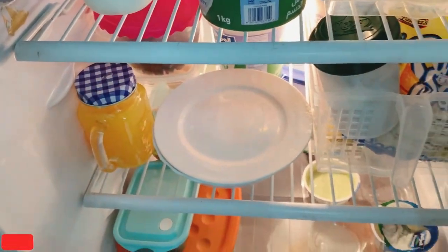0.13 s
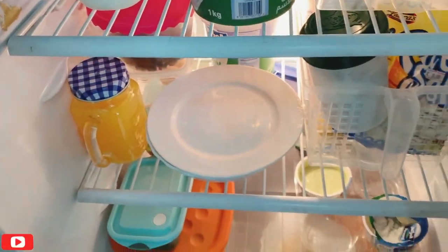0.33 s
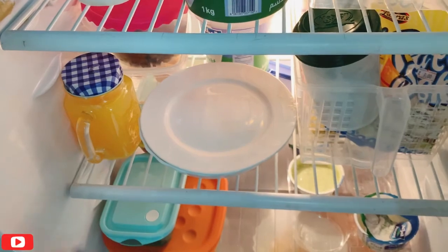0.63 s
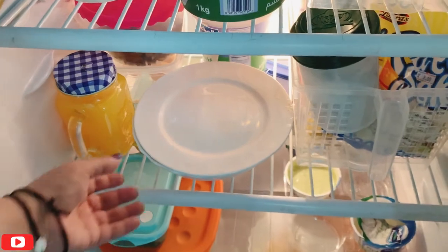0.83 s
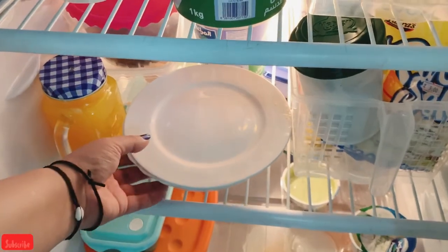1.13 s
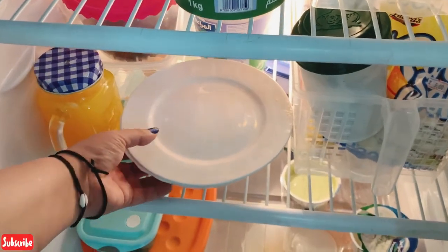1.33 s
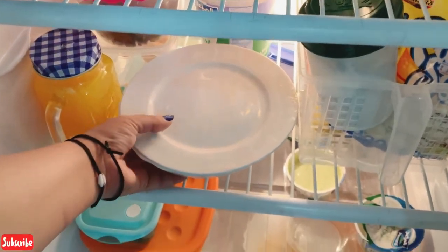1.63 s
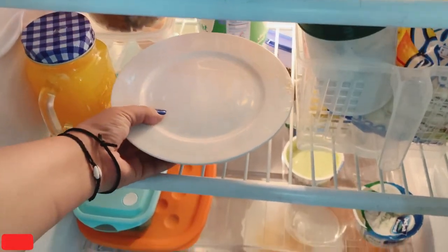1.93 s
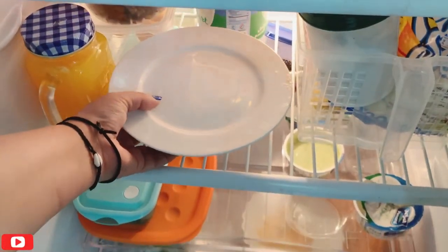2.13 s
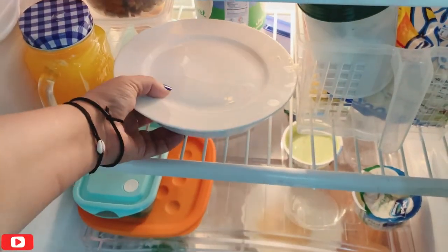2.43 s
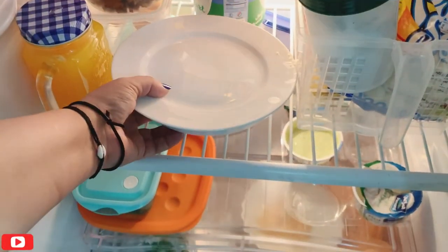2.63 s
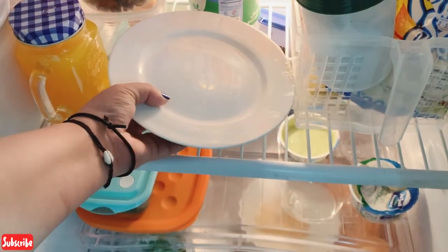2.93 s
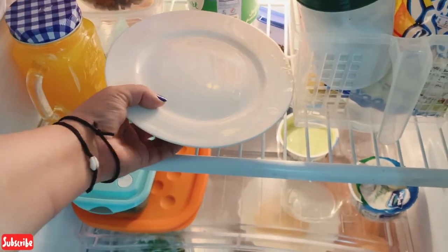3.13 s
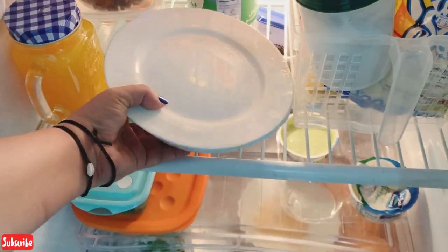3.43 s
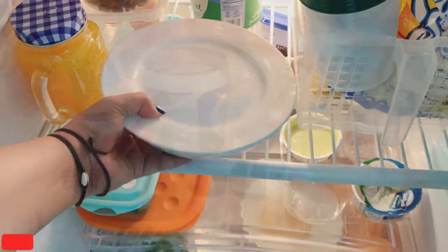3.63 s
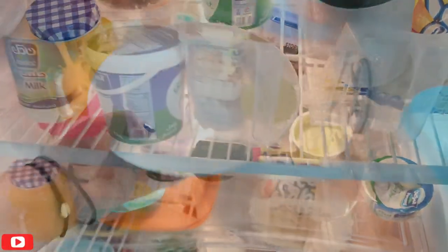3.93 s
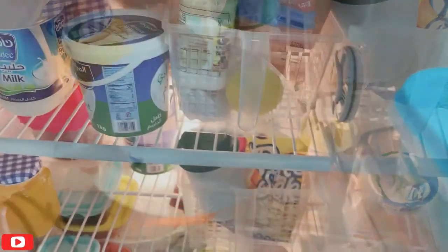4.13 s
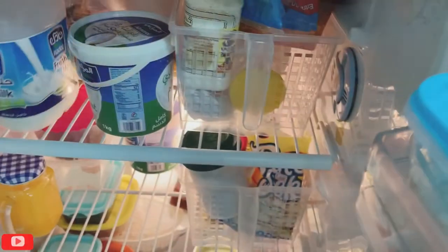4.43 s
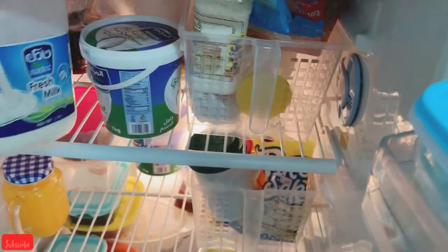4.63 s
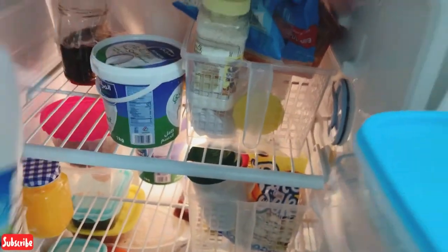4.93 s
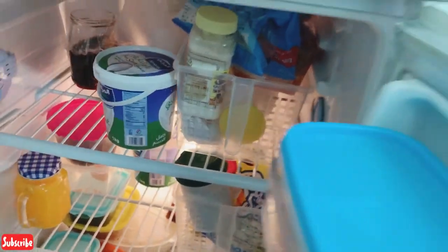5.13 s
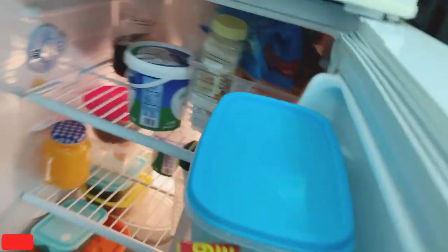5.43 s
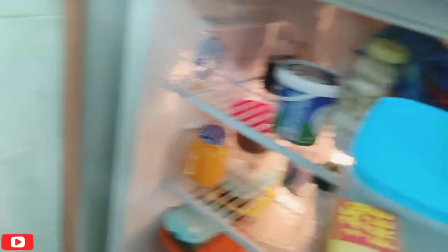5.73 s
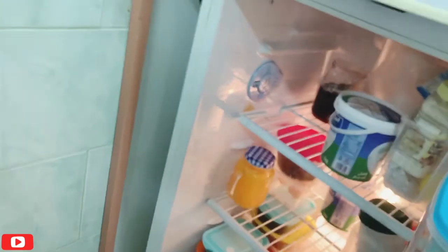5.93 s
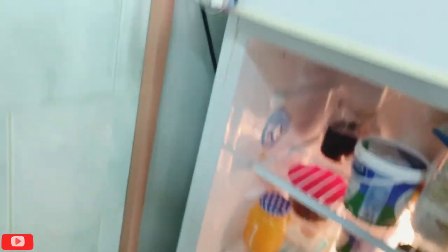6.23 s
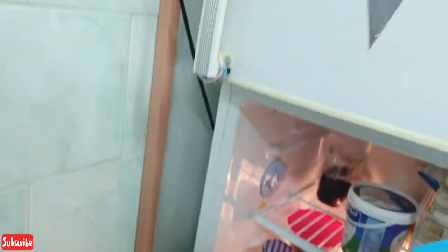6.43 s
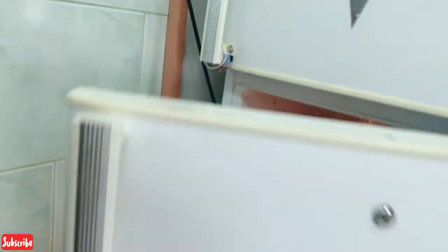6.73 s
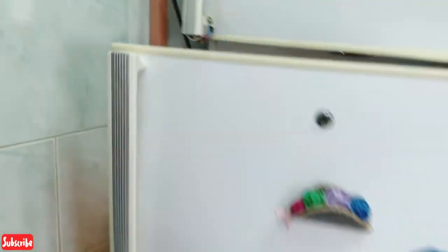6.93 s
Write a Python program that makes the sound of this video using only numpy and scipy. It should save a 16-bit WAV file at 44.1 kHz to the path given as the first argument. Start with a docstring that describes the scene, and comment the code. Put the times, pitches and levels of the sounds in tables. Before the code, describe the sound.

Quiet kitchen hum, then a ceramic plate clatters sharply across wire racks with low shelf thumps, followed by plastic scuffing, hollow knocks and a soft door thud.

```python
"""Low background noise: a lumpy rumble, a machine drone, hum and hiss, all shaped noise or wavering sines. Then
a china plate taps and judders over the wire shelf of an open refrigerator: modal rings set off by contacts. The
shelf thumps and a glass jar pings, both modal; the plate skids to rest from wire to wire. Last, plastic rustles
in noise grains, tubs knock, and door and racks bump as sagging notes with thuds. Event levels are those ahead
of the microphone colour."""
import sys
import numpy as np
from scipy import signal
from scipy.fft import rfft, irfft, next_fast_len
from scipy.io import wavfile
from scipy.ndimage import uniform_filter1d

SR = 44100
rng = np.random.default_rng(int(sys.argv[2]) if len(sys.argv) > 2 else 0)


def master(y):
    """Save y as 16-bit WAV."""
    cut = np.clip(np.atleast_2d(y).T, -1, 1)
    pcm = np.round(cut * 32767)  # scale
    wavfile.write(sys.argv[1], SR, pcm.astype(np.int16))


N = 312669
TIME_S = np.arange(N) / SR
RING_S = np.arange(SR // 2) / SR  # time axis of one event

# background trims: t/s, rumble/dB, drone/dB
BACKGROUND_TRIM = [(0.0, -58.5, -57), (1.2, -54.5, -57), (2.248, -51.5, -51.5), (5.208, -54, -54.5),
                   (5.9, -62, -52.5), (6.12, -46, -46.5), (6.4, -60.5, -56.5), (7.09, -54, -54)]
# trim of the noise near 2 kHz: t/s, level/dB
AIR_TRIM = [(0, -87), (1.3, -100), (1.5, -71.5), (4.65, -71.5), (4.8, -66), (6.2, -69.5), (6.5, -77),
            (7.09, -73)]
# noise spectra: f/Hz, relative density/dB
RUMBLE_SPECTRUM = [(20, -36.5), (32, -28), (41, -2.5), (60, 5.5), (80, -5.5), (110, -10.5), (150, -9.5),
                   (200, -24), (400, -45.5)]
DRONE_SPECTRUM = [(100, -7), (190, -4), (270, 5), (350, -0.5), (480, -6), (750, -7), (1100, -7),
                  (1600, -11.5), (1900, -17), (2400, -38), (4000, -57)]
AIR_SPECTRUM = [(1000, -26), (1900, 8), (2300, 2.5), (2700, -8.5), (4000, -10), (6000, -23.5), (12000, -36)]
FINE_HISS_SPECTRUM = [(1500, -8.5), (3500, 4.5), (5000, -2.5), (7000, 0), (9000, -3.5), (13000, 0.5),
                      (14500, -4.5), (16000, -23)]
CLATTER_SPECTRUM = [(60, -18), (350, -11.5), (650, 4), (830, -10.5), (1050, -3.5), (1350, -0.5),
                    (1900, 5.5), (2170, -3), (3000, 1), (3700, -5), (5000, -2), (7000, -12), (9000, -14.5),
                    (13000, -24), (16000, -33.5)]
TUB_SPECTRUM = [(60, -40), (200, -5.5), (450, 1), (900, 1), (1500, 0.5), (2500, -6), (4000, -12.5),
                (7000, -17.5), (10000, -27), (13500, -27), (16000, -41)]
RUB_HISS_SPECTRUM = [(1500, -21.5), (2800, -5.5), (4000, 1), (5200, -2), (7000, 0.5), (9000, -1.5),
                     (13000, 0.5), (14400, 1.5), (15500, -19.5)]
RUB_BODY_SPECTRUM = [(120, -8), (300, 13), (700, -2.5), (1400, -1.5), (2100, -7), (3000, -8), (5000, -17),
                     (9000, -29)]
# machine tones: mean f/Hz, level before the hum trim/dB
HUM_TONES = [(148, -62), (296, -66)]
# hum trim: t/s, level/dB
HUM_TRIM = [(0, -13.5), (4.0, -1), (4.8, 9.5), (7.09, -0.5)]
# decay of the room: f/Hz, t60/s
ROOM_T60 = [(100, 0.99), (500, 0.33), (3000, 0.29), (8000, 0.081), (14000, 0.054)]

# left-right likeness of near and diffuse sound: f/Hz, likeness (1 = same)
NEAR_LIKENESS = [(50, 0.94), (300, 1), (600, 0.16), (1400, 1), (2300, 0.17), (4500, 0.57), (7000, 1),
                 (13000, 0.95)]
FAR_LIKENESS = [(50, 0.7), (150, 0.56), (300, 0.29), (600, 0.02), (2500, .05), (4500, .3), (7000, 0.17),
                (13000, .55)]
# microphone ports: f/Hz, left lead/rad
PORT_PHASE = [(20, 0), (400, -.2), (700, -.5), (1200, .4), (2200, 0), (3100, 2.1), (3900, 1.5), (4900, 3.1),
              (6600, 6.1), (7300, 6.4), (9500, 9.4), (10000, 9.5), (11900, 12.5), (12800, 12.7),
              (14700, 15.6)]
# microphone ports: f/Hz, left-right/dB
PORT_BALANCE = [(40, 0), (120, -0.5), (300, -2), (600, -1.5), (1200, -0.5), (2400, -0.5), (4500, -0.5),
                (14000, 0)]
# microphone response: f/Hz, level/dB
MIC_COLOUR = [(20, -3.5), (8600, -4.5), (9300, -4.5), (9900, -16.5), (10700, -5.5), (14000, -6),
              (14900, -9), (16000, -4.5)]
EDGE_HZ = 16000

# bumps of cabinet walls, door and racks: t/s, level/dB, f of the yielding wall/Hz
BUMPS = [(2.385, -34, 262), (2.728, -26.5, 210), (3.322, -20.5, 235), (3.353, -26.5, 396),
         (3.92, -43.5, 228), (4.197, -52, 251), (4.244, -38.5, 182), (4.452, -50, 285), (4.69, -31, 169),
         (4.712, -29.5, 123), (5.545, -35.5, 321), (5.84, -37.5, 372), (5.875, -34, 278),
         (6.073, -30.5, 115), (6.127, -38.5, 109), (6.189, -38.5, 142), (6.225, -38, 129)]
# knocks of tubs and door racks: t/s, level/dB, softness/(dB/kHz), f of the struck wall/Hz
KNOCKS = [(3.867, -52.5, 1.5, 1480), (3.915, -51.5, 1.94, 1005), (4.041, -56, 1, 776),
          (4.061, -44.5, 4, 730), (4.192, -36.5, 8.5, 575), (4.239, -37.5, 6, 550), (4.371, -40, 4, 1210),
          (4.386, -41, 5, 806), (4.685, -34.5, 4.5, 872), (5.438, -53, -1, 1995), (5.543, -27.5, 8.5, 470),
          (5.556, -36.5, 6.5, 870), (5.579, -29, 9.5, 683), (5.829, -46, 1, 580), (5.861, -35.5, 2.1, 440),
          (6.069, -41, 6.5, 694), (6.103, -37, 13, 1220), (6.139, -36, 10, 646), (6.185, -18, 20, 659),
          (6.731, -51.5, 2, 1330)]
# sliding plastic, one table a movement: t/s, level/dB
RUBS = [
    [(3.78, -57), (3.97, -74), (4.0, -58), (4.44, -53), (4.53, -68)],
    [(5.435, -56), (5.45, -42), (5.58, -47.5), (5.7, -51), (5.8, -50.5), (5.95, -49.5), (6.06, -54),
     (6.12, -64), (6.3, -69), (6.5, -79.5)],
]
# short strokes of plastic or hand: middle t/s, half length/s, body/dB, hiss/dB
SCUFFS = [(1.497, 0.025, -56.5, -71), (4.022, 0.024, -50.5, -48), (4.223, 0.041, -56, -48),
          (4.39, 0.047, -56, -47), (4.458, 0.016, -38.5, -55), (5.496, 0.026, -40.5, -45.5),
          (5.527, 0.012, -41, -60), (5.612, 0.023, -47, -46), (5.753, 0.019, -42, -42.5),
          (5.984, 0.041, -46, -50), (6.05, 0.059, -43, -72), (6.764, 0.033, -46, -60.5)]
# creaks of a dragged tub: middle t/s, half length/s, level/dB
CREAKS = [(4.05, 0.024, -46.5), (4.394, 0.032, -44), (4.397, 0.16, -57), (5.753, .022, -52),
          (5.859, 0.015, -41.5)]
# jar pings: t/s, level/dB
JAR_PINGS = [(1.716, -41), (2.263, -44.5), (2.35, -43)]
# full weight on the shelf: t/s, level/dB, f favoured by the blow/Hz
THUMPS = [(1.957, -46, 281), (2.029, -35, 88.4), (2.261, -32, 206), (2.359, -35.5, 150),
          (2.725, -22.5, 243), (2.742, -29.5, 75), (2.766, -27.5, 355), (2.864, -19, 107),
          (2.874, -25, 257), (3.128, -28.5, 210), (3.16, -33, 116.5), (3.317, -23.5, 398),
          (3.354, -30, 433), (3.398, -41, 400), (3.426, -39, 119), (3.445, -38.5, 375)]
# single taps on the wires: t/s, level/dB, softness/(dB/kHz), f favoured/Hz
TAPS = [(1.712, -38.5, 4.5, 1550), (2.067, -39, 3.5, 1360), (2.156, -40, 4, 2040), (2.258, -34, 2, 1400),
        (2.308, -36, 1.2, 1130), (2.352, -33.5, 3, 3300), (2.357, -35.5, 3, 1550),
        (2.371, -30.5, 4.5, 1290), (2.393, -35, 5, 1290), (2.717, -44, -1, 6700), (2.724, -40, 0, 6700),
        (3.118, -45.5, 1.6, 950), (3.313, -34.5, -1, 1242), (3.321, -26, 3, 956),
        (3.496, -47.5, 0.27, 3980), (3.52, -49.5, 0.5, 4020)]
# rim onto a wire: t/s, level/dB, softness/(dB/kHz), trim of the lowest band/dB, f favoured/Hz
CLACKS = [(1.885, -22, 1.6, -4, 1370), (1.902, -20.5, 1.5, 0, 1270), (1.921, -21.5, 2.5, 2.5, 1280),
          (1.943, -23, 2, 2.5, 1300), (1.973, -41, -0.5, -12, 1930), (1.987, -40, 2, 14.5, 1450),
          (2.002, -32, 4.5, -1, 1360), (2.759, -27.5, 1.74, -0.5, 1210), (2.783, -26, 2, 7, 1610),
          (2.7987, -13.5, 2, -5.5, 1260), (2.809, -19, 2, 0.5, 1400), (2.817, -12.5, 1.5, -7, 1290),
          (2.829, -13, 2.44, -2, 2000), (2.84, -16, 3, -2, 1300), (2.851, -17.5, 2.5, 1, 1270),
          (3.3505, -20, 2.5, -7, 1520), (3.373, -29, 3, -9, 1610), (3.387, -25.5, 4.5, -2, 1290),
          (3.401, -36, 1.5, -11, 1870)]
# foot from wire to wire: t/s, level/dB, softness/(dB/kHz), trim of the lowest band/dB, f favoured/Hz
SKIDS = [(3.6535, -32.5, 0.5, 10.5, 1399), (3.678, -35.5, -2.5, 13, 1390), (3.699, -39.5, .3, 13, 1440),
         (3.718, -45, -1, 17.5, 470), (3.736, -45, 0, 19, 450), (3.757, -45, -0.1, 10, 1640)]

# modes: f/Hz, relative level/dB, t60/s, left-right/dB
TUB_WALL_MODES = [(756, -14, .03, -6), (970, 5, 0.042, 0), (1360, 3, 0.027, -7), (1390, -9, .04, -6),
                  (1900, -3, 0.034, 0), (2600, -2, 0.017, -7), (3590, 0, .02, -16), (4000, 5.5, 0.013, 0)]
JAR_MODES = [(1810, -6, 0.31, -0.5), (3080, -28, 0.12, -11)]
SHELF_MODES = [(63.8, -2.5, 0.22, 5.5), (82, 5, 0.26, 3), (106.2, 17.5, 0.29, -3), (139, 4, 0.071, 0.5),
               (164.9, 0.5, 0.28, 4.5), (254.5, 1, 0.16, 2), (271.4, 2.5, 0.13, -1.5),
               (359.6, -7.5, 0.78, 0.5), (388, -1, 0.19, 1.5), (399, -9, 0.27, 0.5),
               (454, -9.5, 0.17, -3.5)]
# modes under the holding hand: f/Hz, relative level/dB, undamped t60/s, left-right/dB
PLATE_MODES = [(479.5, 1, .12, -0.5), (681, 2, 0.22, 4), (1230, -8, 0.28, -7), (1248, 1, .09, -5),
               (1270, 2, 0.082, -5), (1399, 1.5, 0.064, -1.5), (1540, -3, 0.1, 1.5), (1603, -3, 0.17, 0),
               (1621, -4, 0.13, -.5), (1941, -9, .22, -1.5), (2658, -4, 0.22, -6), (3010, -2.5, 0.09, -5),
               (3000, -9.5, 0.18, -5), (3320, -2, 0.18, -2), (4330, -1, 0.19, 3.5), (4490, -4, 0.15, -1.5),
               (4620, 0.5, .11, 0.5), (5270, -5, .1, 0.5), (6030, -6.5, .11, 0), (6040, -9, 0.15, 2),
               (6630, -3.5, .13, 3), (7300, -8, 0.099, -2)]
FOOT_MODES = [(450.7, -7, 0.13, 5), (501.4, 1, 0.12, -1.5), (673, -6, 0.25, 4), (1360, -0.5, 0.039, -3),
              (1644, -5, 0.11, 1), (1970, -10, 0.28, 2), (2444, -19, 0.14, -6), (2980, -4, 0.3, -3),
              (3260, 1, 0.096, -9), (3900, 2, 0.059, 1), (4720, 3.5, 0.096, -1), (5475, 3.5, 0.088, -2),
              (6710, -5, 0.039, 2)]
WIRE_MODES = [(510, -1.5, .15, -2.5), (668, -6.5, 0.26, 5.5), (962, -1, .11, -1), (1110, -4.5, 0.054, -2.5),
              (1288, -3, 0.2, -4), (1537, -5, 0.12, 0), (2011, -5, 0.29, -2.5), (2640, -7, 0.21, -5),
              (3014, -10.5, 0.11, -2.5), (3470, -4, .1, -3.5), (4565, -1.5, 0.16, -0.5),
              (5780, -12.5, 0.051, 1.5), (6660, -8, 0.14, 2), (12900, -5.5, 0.025, 2)]

# bands of taps and knocks: low f/Hz, high f/Hz
BANDS = [(400, 800), (870, 2000), (2500, 8000), (10500, 14500)]
# bands of clacks and skids: low f/Hz, high f/Hz
SLIP_BANDS = [(400, 800), (1000, 1800), (2300, 4000), (5500, 8500)]
# perfectly hard contact, relative to its level: one value a band/dB
SLIP_HARD_DB = [-9, 0, -7.5, -2.5]
TAP_HARD_DB = [-2.5, -0.5, 1.5, 3]
KNOCK_HARD_DB = [-3.5, 0.5, 9.5, 15]

# slips above this level rattle the wires: dB of rattle per dB
RATTLE_FROM_DB, RATTLE_DB_PER_DB = -22.5, 0.45
# shove on the shelf: dB relative to the contact, f favoured/Hz
CLACK_PUSH, TAP_PUSH = (-16, 290), (-2.5, 230)
PUSH_LAG_S = 0.004
FAVOUR_OCTAVES = 0.28  # width of the favoured region
PLACE_DB = 3  # chance spread of each mode, either way
BEND_S = 0.016  # time constant of the settling pitch
HELD = 0.62  # share of t60 left by the holding hand


def amp(db):
    """dB to amplitude."""
    return 10 ** (np.asarray(db) / 20)


def rms(x):
    """Root mean square, never zero."""
    return np.sqrt(np.mean(x ** 2) + 1e-20)


def attack_level(x):
    """Rms of the first 20 ms."""
    return rms(x[..., :SR // 50])


def dying(t60_s):
    """Exponential decay by 60 dB in t60_s."""
    return np.exp(-np.log(1000) * RING_S / max(t60_s, 1e-3))


def onset(rise_s):
    """Exponential rise of a contact that yields."""
    return 1 - np.exp(-RING_S / rise_s)


def track(points, *outside):
    """Two-column time table, linear in t."""
    return np.interp(TIME_S, *np.transpose(points), *outside)


def read(points, hz):
    """Spectrum table on a log-frequency axis."""
    f, value = np.transpose(points)
    return np.interp(np.log(hz + 1), np.log(f + 1), value)


def bins(x):
    """FFT bin frequencies in Hz."""
    return np.fft.rfftfreq(x.shape[-1], 1 / SR)


def pad_for_fft(x, tail):
    """Zero-pads by at least tail samples to a fast FFT length."""
    size = x.shape[1]
    return np.pad(x, ((0, 0), (0, next_fast_len(size + tail, True) - size)))


def add(mix, s, sound):
    """Adds sound to mix at s seconds, cut at the end."""
    part = mix[:, max(round(s * SR), 0):][:, :sound.shape[1]]
    part += sound[:, :part.shape[1]]


def colour(x, spectrum):
    """Filters x by a table of f/Hz, gain/dB."""
    padded = pad_for_fft(x, SR // 20)
    shaped = rfft(padded) * amp(read(spectrum, bins(padded)))
    return irfft(shaped, padded.shape[1])[:, :x.shape[1]]


def noise(spectrum, likeness, size, ripple_db=0, ripple_hz=70):
    """Coloured stereo noise of rms 1, partly shared; crowded resonances ripple it, fully above 3 kHz."""
    white = rng.standard_normal((2, next_fast_len(size, True)))
    hz, knots = bins(white), rng.standard_normal(SR // 50)
    ripple = ripple_db * np.interp(hz / ripple_hz, np.arange(len(knots)), knots)
    ripple *= np.minimum(hz / 3000, 1)
    a, b = rfft(white) * amp(read(spectrum, hz) + ripple)
    same = np.clip(read(likeness, hz), -1, 1)
    right = same * a + np.sqrt(1 - same ** 2) * b
    pair = irfft([a, right], white.shape[1])[:, :size]
    return pair / rms(pair)


def wander(per_s):
    """Random drift between knots of rms 1."""
    knots = rng.standard_normal(int(N / SR * per_s) + 2)
    return np.interp(TIME_S * per_s, np.arange(len(knots)), knots / rms(knots))


def patchy(x, depth_db, size):
    """The colour drifts in smooth random patches of time and frequency."""
    z = signal.stft(x, nperseg=1024)[2]
    field = rng.standard_normal(z.shape[1:])
    field = uniform_filter1d(uniform_filter1d(field, size, 0), 6, 1)
    gain = amp(depth_db * field / rms(field))
    return signal.istft(z * gain / rms(gain), nperseg=1024)[1][:, :N]


def grains(per_s, spread_db):
    """Random tiny slips of uneven size, rms 1."""
    size = amp(spread_db * np.minimum(rng.exponential(1, N), 3)) * rng.choice([-1, 1], N)
    slips = size * (rng.random(N) < per_s / SR)
    return slips / rms(slips)


def excite(force, response):
    """A body answers a running force; rms 1."""
    sound = signal.oaconvolve(force[None], response[:, :SR // 10], axes=1)[:, :N]
    return sound / rms(sound)


def ring(modes, bend=0):
    """Decaying modes start sharp by the share bend and settle; level and phase differ at the two ports."""
    clock = RING_S + bend * BEND_S * (1 - np.exp(-RING_S / BEND_S))
    sides = np.array([[.5], [-.5]])
    out = np.zeros((2, len(RING_S)))
    for (hz, db, t60_s, pan_db), (sign, skew) in zip(modes, rng.choice([-1, 1], (len(modes), 2))):
        offset = skew * np.arccos(np.clip(read(NEAR_LIKENESS, hz), -1, 1)) * min(hz / 2500, 1)
        wave = np.sin(2 * np.pi * hz * clock + sides * offset)
        out += sign * amp(db + sides * pan_db) * dying(t60_s) * wave
    return out / attack_level(out)


def band_levels(bands, hard_db, db, softness):
    """A softer contact lasts longer and so loses treble, by the same dB for every kHz."""
    khz = np.sqrt(np.prod(bands, axis=1)) / 1000
    return db + np.array(hard_db) - max(softness, 0) * khz


def voiced(sound, bands, band_db):
    """Hardness and place of a contact decide how strongly each band sounds."""
    head = np.pad(sound[:, :SR // 50], ((0, 0), (0, SR // 50)))
    power = np.mean(abs(rfft(head)) ** 2, 0) * (2 / head.shape[1]) ** 2
    hz = bins(head)
    gains = []
    for (lo, hi), db in zip(bands, band_db):
        now_db = 10 * np.log10(power[(hz > lo) & (hz < hi)].sum())
        gains.append((np.sqrt(lo * hi), db - now_db))
    return colour(sound, gains)


def blow(modes, hz, thud_edges_db, thud_db, thud_t60_s, rise_s, bend=0):
    """Modes plus a low noise thud around hz, attack level 1."""
    at_70_hz, at_octave, at_1500_hz = thud_edges_db
    spectrum = [(25, -28), (70, at_70_hz), (hz, 0), (2 * hz, at_octave), (1500, at_1500_hz), (6000, -80)]
    thud = noise(spectrum, NEAR_LIKENESS, size=len(RING_S)) * dying(thud_t60_s)
    sound = (ring(modes, bend) + amp(thud_db) * thud / attack_level(thud)) * onset(rise_s)
    return sound / attack_level(sound)


def background(rumble_db=5, drone_db=4, air_db=6, hiss_db=-79, lumps_db=2):
    """Lumpy low rumble, diffuse machine drone, noise near 2 kHz and faint hiss."""
    t, *columns = np.transpose(BACKGROUND_TRIM)
    low, middle = (np.interp(TIME_S, t, c) for c in columns)
    rumble_gain = amp(rumble_db + low + lumps_db * wander(7.2))
    rumble = rumble_gain * noise(RUMBLE_SPECTRUM, NEAR_LIKENESS, size=N)
    drone = amp(drone_db + middle) * noise(DRONE_SPECTRUM, FAR_LIKENESS, size=N)
    air = amp(air_db + track(AIR_TRIM)) * noise(AIR_SPECTRUM, FAR_LIKENESS, size=N)
    hiss = amp(hiss_db) * noise(FINE_HISS_SPECTRUM, FAR_LIKENESS, size=N)
    return rumble + patchy(drone + air, depth_db=4.0, size=4) + hiss


def hum(waver_hz=1.9, waver_db=2):
    """Faint machine tones, wavering in pitch and level, that swell and then sink."""
    trim, out = track(HUM_TRIM), 0
    for hz, db in HUM_TONES:
        level = amp(db + trim + waver_db * wander(6.9)) * np.sqrt(2)
        phase = 2 * np.pi * np.cumsum(hz + waver_hz * wander(7.4)) / SR
        out = out + level * np.sin(phase)
    return out


def room(x):
    """The tiled kitchen answers with a noise tail, shorter in the treble."""
    hz, t, z = signal.stft(rng.standard_normal((2, len(RING_S))), SR, nperseg=256)
    decay = np.exp(-np.log(1000) * t / read(ROOM_T60, hz)[:, None])
    tail = signal.istft(z * decay, SR, nperseg=256)[1]
    tail[:, :SR // 100] = 0  # 10 ms before the first reflection
    return signal.fftconvolve(x, tail / np.linalg.norm(tail[0]), axes=1)[:, :N]


def door():
    """The foam-filled walls give one short, sagging note and a thud."""
    out = np.zeros((2, N))
    for s, db, hz in BUMPS:
        sound = blow([(hz, 0, 0.11, 0)], hz, (-4, -7, -36), thud_db=-6, thud_t60_s=0.25, rise_s=0.00078, bend=0.24)
        add(out, s, amp(db) * sound)
    return out


def rubbing(body_db=0, grain_db=0.0, catch_db=3.0, drift_db=3.5, body_t60_s=0.026):
    """Sliding plastic hisses in fine grains, catches unevenly and swells into scuffs where it is pressed."""
    slide = sum(amp(track(rows, -120, -120)) for rows in RUBS)
    hiss_power, body_power = slide ** 2, (amp(body_db) * slide) ** 2
    for s, half_s, press_db, edge_db in SCUFFS:
        stroke = np.exp(-((TIME_S - s) / half_s) ** 2)
        hiss_power = hiss_power + stroke * amp(edge_db) ** 2
        body_power = body_power + stroke * amp(press_db) ** 2
    response = noise(RUB_BODY_SPECTRUM, NEAR_LIKENESS, size=len(RING_S)) * dying(body_t60_s)
    crackle = excite(grains(per_s=600, spread_db=3), response)
    grip = amp(grain_db * wander(640) + catch_db * wander(70))
    hiss = noise(RUB_HISS_SPECTRUM, NEAR_LIKENESS, size=N) * grip / rms(grip)
    return patchy(np.sqrt(hiss_power) * hiss + np.sqrt(body_power) * crackle, drift_db, size=6)


def creaks():
    """Quick small slips ring the wall of a dragged tub."""
    level = sum(amp(db) * np.exp(-((TIME_S - s) / half_s) ** 2) for s, half_s, db in CREAKS)
    return level * excite(grains(per_s=540, spread_db=0.0), ring(TUB_WALL_MODES))


def tubs(hollow_t60_s=0.1, snap_t60_s=0.025, hollow_db=-4, rise_s=0.0013, note_db=-4, note_t60_s=0.064):
    """Plastic hardly rings: a short snap, a brief note of the struck wall and a hollow, darker tail."""
    out = np.zeros((2, N))
    for s, db, softness, hz in KNOCKS:
        snap = noise(TUB_SPECTRUM, NEAR_LIKENESS, size=len(RING_S), ripple_db=6) * dying(snap_t60_s)
        dark = colour(noise(TUB_SPECTRUM, NEAR_LIKENESS, size=len(RING_S)), [(1500, 1.0), (5000, -1.8)])
        hollow = amp(hollow_db) * dark * dying(hollow_t60_s)
        note = amp(note_db) * attack_level(snap) * ring([(hz, 0, note_t60_s, 0)])
        sound = (snap + note + hollow) * onset(rise_s)
        add(out, s, voiced(sound, BANDS, band_levels(BANDS, KNOCK_HARD_DB, db, softness)))
    return out


def jar():
    """The plate touches the glass jar, which rings in two modes."""
    out, ping = np.zeros((2, N)), ring(JAR_MODES)
    for s, db in JAR_PINGS:
        add(out, s, amp(db) * ping)
    return out


def pushes():
    """The shove that each clack and tap gives the shelf: t/s, level/dB, f/Hz."""
    kinds = [(CLACKS, CLACK_PUSH), (TAPS, TAP_PUSH)]
    return [(s + PUSH_LAG_S, db + push_db, hz)
            for rows, (push_db, hz) in kinds for s, db, *_ in rows]


def shelf(octaves=0.28):
    """A blow bends the loaded shelf; where it lands picks the modes that answer."""
    out = np.zeros((2, N))
    for s, db, hz in THUMPS + pushes():
        modes = [(f, level - 10 * np.log10(1 + (np.log2(f / hz) / octaves) ** 4), t60_s, pan)
                 for f, level, t60_s, pan in SHELF_MODES]
        sound = blow(modes, hz, (-2, -9, -40), thud_db=-7, thud_t60_s=0.2, rise_s=0.00055)
        add(out, s, amp(db) * sound)
    return out


def contacts(rows, bands, modes, liner_db, liner_t60_s, clatter_db, clatter_t60_s, chatter, chatter_t60_s,
             rise_s, favour_db, crack_db, detune, bend):
    """Each contact chatters briefly into the modes and the liner's dense echo, while loose wires rattle."""
    out, size = np.zeros((2, N)), len(RING_S)
    liner = noise(CLATTER_SPECTRUM, NEAR_LIKENESS, size, ripple_db=4.0) * dying(liner_t60_s)
    liner *= amp(liner_db) / attack_level(liner)
    mode_hz = np.array(modes)[:, 0]
    for s, favoured_hz, band_db in rows:
        # the place of contact favours some modes and shifts them a little
        chance, shifts = rng.uniform(-1, 1, (2, len(modes)))
        nearness = np.exp(-(np.log2(mode_hz / favoured_hz) / FAVOUR_OCTAVES) ** 2)
        place_db = favour_db * nearness + PLACE_DB * chance
        struck = [(hz * (1 + detune * shift), db + lift, t60_s * HELD, pan)
                  for (hz, db, t60_s, pan), lift, shift in zip(modes, place_db, shifts)]
        body = ring(struck, bend) + liner
        # tiny bounces, 900 a second on average, after a first touch of 1
        bounces = rng.standard_normal(size) * (rng.random(size) < 900 / SR)
        force = chatter * bounces * dying(chatter_t60_s)
        force[0] = 1
        tone = signal.fftconvolve(body, force[None, :SR // 10], axes=1)[:, :size]
        rattle_decay = dying(clatter_t60_s) + amp(crack_db) * dying(0.014)
        clatter = noise(CLATTER_SPECTRUM, NEAR_LIKENESS, size, ripple_db=9.0) * rattle_decay
        sound = tone / attack_level(tone) + amp(clatter_db) * clatter / attack_level(clatter)
        add(out, s, voiced(sound * onset(rise_s), bands, band_db))
    return out


def slip(s, db, softness, body_db, favoured_hz):
    """One contact of the plate; the strongest rattle the wires in the third band."""
    rattle_db = RATTLE_DB_PER_DB * max(db - RATTLE_FROM_DB, 0)
    levels = band_levels(SLIP_BANDS, SLIP_HARD_DB, db, softness) + [body_db, 0, rattle_db, 0]
    return s, favoured_hz, levels


def plate():
    """The rim clacks and judders across the wires and taps them in between; then the foot skids to rest."""
    slip_rows = [slip(*row) for row in CLACKS]
    tap_rows = [(s, hz, band_levels(BANDS, TAP_HARD_DB, db, softness)) for s, db, softness, hz in TAPS]
    skid_rows = [slip(*row) for row in SKIDS]
    slips = contacts(
        slip_rows, SLIP_BANDS, PLATE_MODES, liner_db=-9, liner_t60_s=0.15, clatter_db=-11,
        clatter_t60_s=0.08, chatter=0.22, chatter_t60_s=0.045, rise_s=0.0048, favour_db=12,
        crack_db=-2.0, detune=0.002, bend=0.0046)
    taps = contacts(
        tap_rows, BANDS, WIRE_MODES, liner_db=-3.0, liner_t60_s=0.092, clatter_db=-3.0,
        clatter_t60_s=0.1, chatter=0.4, chatter_t60_s=0.048, rise_s=0.0014, favour_db=13.5,
        crack_db=12.5, detune=0.0075, bend=0.0056)
    skids = contacts(
        skid_rows, SLIP_BANDS, FOOT_MODES, liner_db=-9, liner_t60_s=0.11, clatter_db=-3.5,
        clatter_t60_s=0.087, chatter=0.19, chatter_t60_s=0.063, rise_s=0.0024, favour_db=12.5,
        crack_db=3.0, detune=0.0065, bend=0.01)
    return slips + taps + skids


def scene(room_db=-21):
    """Everything that is handled, in the kitchen."""
    near = door() + rubbing() + creaks() + tubs() + jar() + shelf() + plate()
    return background() + hum() + amp(room_db) * room(near) + near


def record(dry):
    """Two microphone ports differ in phase and level; then a low-pass at the band edge."""
    padded = pad_for_fft(dry, SR // 10)
    hz, sides = bins(padded), np.array([[.5], [-.5]])
    gain_db = sides * read(PORT_BALANCE, hz) + read(MIC_COLOUR, hz)
    ports = np.exp(1j * sides * read(PORT_PHASE, hz)) * amp(gain_db)
    heard = irfft(rfft(padded) * ports, padded.shape[1])[:, :N]
    lowpass = signal.firwin(511, EDGE_HZ, window=("kaiser", 9), fs=SR)
    return signal.oaconvolve(heard, lowpass[None], "same")


dry = scene()
out = record(dry)
master(out)
```